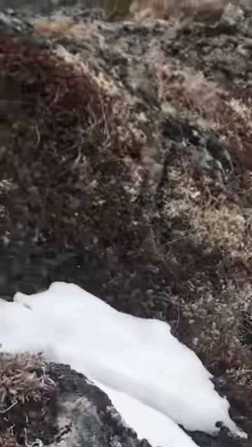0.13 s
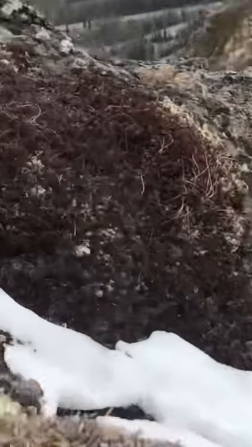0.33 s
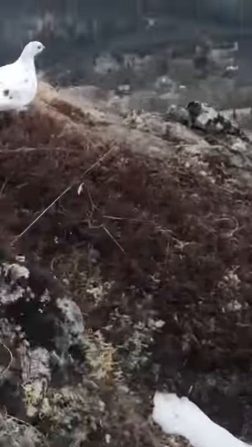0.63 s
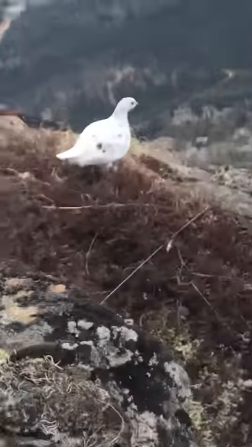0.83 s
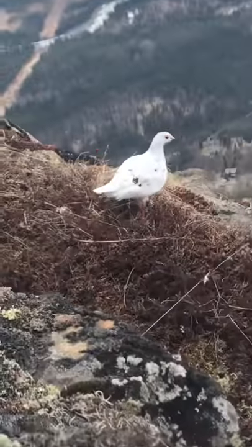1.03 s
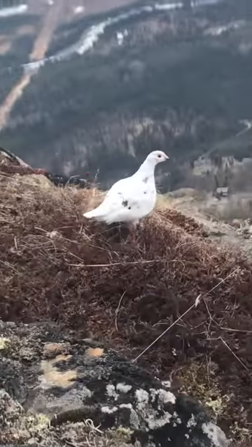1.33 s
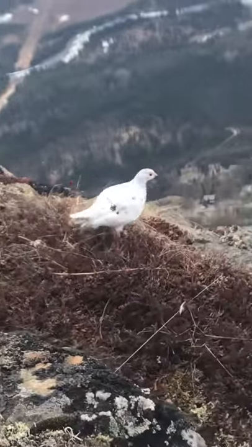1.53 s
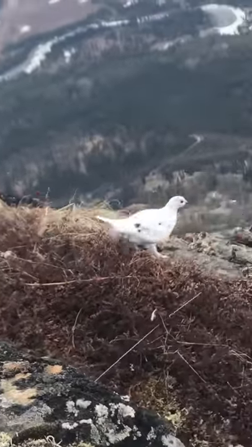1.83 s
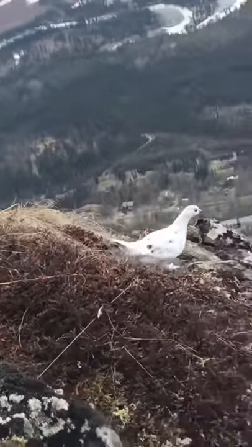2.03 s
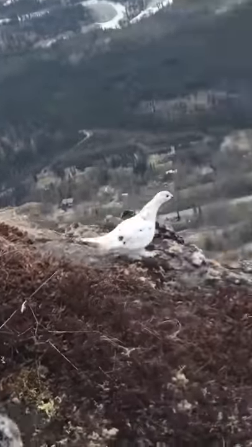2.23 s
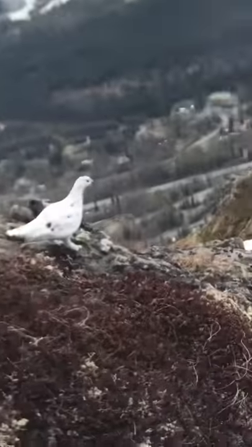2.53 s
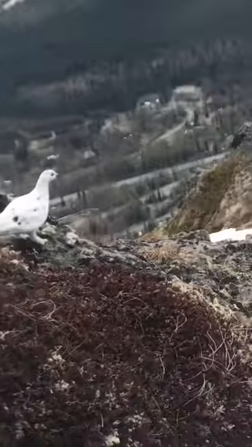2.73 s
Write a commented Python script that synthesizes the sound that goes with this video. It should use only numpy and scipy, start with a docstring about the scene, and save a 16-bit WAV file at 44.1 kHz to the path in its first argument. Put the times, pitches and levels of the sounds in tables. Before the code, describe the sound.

Dry, throaty bird clicks come in two short runs as wind buffets the microphone.

```python
"""An open ridge, with wind rumbling on the microphone throughout. Close by, clothing rustles and
heather twigs snap under a step. A ptarmigan gives a short run of dry clicks that ring in its throat,
slowing and turning hollow, as eddies begin to knock on the microphone. A second, shorter run follows.
Near the end a small bird chirps faintly, far down the valley."""
import sys
import numpy as np
from scipy import signal
from scipy.fft import rfft, irfft
from scipy.io import wavfile
from scipy.ndimage import uniform_filter1d

SR = 44100
rng = np.random.default_rng(int(sys.argv[2]) if len(sys.argv) > 2 else 0)


def waveform_to_disk(signal):
    """Save audio, clipped to [-1, 1], as 16-bit WAV at the path in sys.argv[1]."""
    frames = np.transpose(np.atleast_2d(signal))
    scaled = np.clip(frames, -1, 1) * 32767
    samples = np.round(scaled).astype(np.int16)
    wavfile.write(sys.argv[1], SR, samples)


N = 127890
T = np.arange(N) / SR
BURST_T = T[:4096]  # time within one click or snap, s


def from_db(db):
    """Decibels to gain."""
    return 10 ** (np.asarray(db) / 20)


def rms_one(x):
    """Scale to unit rms."""
    return x / np.sqrt(np.mean(x ** 2) + 1e-20)


def level(rows):
    """Gain over time from rows of time_s, level_db."""
    return from_db(np.interp(T, *np.transpose(rows)))


def cut(x, hz, kind, order=2):
    """Butterworth filter."""
    return signal.sosfilt(signal.butter(order, hz, kind, fs=SR, output="sos"), x)


def coloured(x, colour):
    """Shape a spectrum by rows of freq_hz, gain_db, falling 20 dB an octave past the ends; unit rms."""
    hz, db = np.transpose(colour)
    octave = np.log2(np.maximum(np.arange(N // 2 + 1) * SR / N, 1))
    beyond = np.abs(octave - np.clip(octave, np.log2(hz[0]), np.log2(hz[-1])))
    gain = from_db(np.interp(octave, np.log2(hz), db) - 20 * beyond)
    return rms_one(irfft(rfft(x) * gain, N))


def noise(colour):
    """Noise with the given spectrum."""
    return coloured(rng.standard_normal(N), colour)


def drift(rate_hz):
    """Random wander below the given rate, at unit rms."""
    return rms_one(cut(rng.standard_normal(N + SR), rate_hz, "low")[SR:])


def ring(x, hz, t60):
    """A resonance: each impulse starts a sine that dies by 60 dB in t60 seconds."""
    r, w = from_db(-60 / (t60 * SR)), 2 * np.pi * hz / SR
    return signal.lfilter([0, np.sin(w)], [1, -2 * r * np.cos(w), r * r], x + 1e-18)


def add(out, start_s, x):
    """Mix a sound in at a time."""
    i = int(start_s * SR)
    out[i:i + len(x)] += x[:N - i]


def grains(per_s, low_hz, high_hz, count=16, ring_cycles=9, spread_db=3):
    """Tiny slips of uneven size, each ringing briefly at one of several pitches."""
    sizes = from_db(spread_db * np.minimum(rng.exponential(1, N), 4)) * rng.choice([-1, 1], N)
    slips = sizes * (rng.random(N) < per_s / SR)
    pitch_index = rng.integers(0, count, N)
    pitches = enumerate(np.geomspace(low_hz, high_hz, count))
    return rms_one(sum(hz * ring(slips * (pitch_index == k), hz, ring_cycles / hz) for k, hz in pitches))


def valley_hush():
    """The soft, nearly steady hush of distant air."""
    # spectrum of the hush: freq_hz, gain_db
    colour = [(290, -15.5), (500, -7), (611, -4), (748, -3.5), (876, -4), (982, -3), (1090, -6.5),
              (1430, -10), (2100, -21), (2720, -21), (4570, -29), (15500, -33)]
    # its loudness: time_s, level_db
    loudness = [(0, -58.5), (.7, -63), (1.1, -63.5), (1.4, -63), (2.0, -64), (2.5, -63), (2.9, -62)]
    return level(loudness) * noise(colour)


def far_songbird():
    """A small bird far down the valley whistles short, wavering glides."""
    # chirps: start_s, length_s, start_hz, end_hz, level_db
    chirps = [(2.452, .06, 2680, 2850, -76), (2.515, .03, 3750, 3500, -76), (2.57, .035, 3550, 3270, -74.5),
              (2.63, .028, 3280, 3330, -73)]
    out = np.zeros(N)
    waver = 1 + .022 * drift(rate_hz=150)
    for start_s, length_s, start_hz, end_hz, level_db in chirps:
        progress = np.clip((T - start_s) / length_s, 0, 1)
        pitch_hz = (start_hz + (end_hz - start_hz) * progress) * waver
        swell = np.sqrt(np.abs(np.sin(np.pi * progress)))
        out += from_db(level_db) * swell * np.sin(2 * np.pi * np.cumsum(pitch_hz) / SR)
    return out


def wind(rumble_db=1.5, top_hz=204.6, even_s=.035, flutter_depth_db=5.5):
    """Rumble follows the wind pressure on the microphone; above it the air flutters quickly."""
    # wind pressure: time_s, relative_db
    pressure = [(0.0, -32.5), (0.03, -25.5), (0.37, -34.5), (0.38, -29), (0.7, -33.5), (0.76, -24.5),
                (0.86, -27), (0.95, -18.5), (1.12, -26), (1.31, -20), (1.33, -24.5), (1.39, -21.5),
                (1.5, -29), (1.56, -21), (1.6, -26), (1.71, -19), (1.8, -31.5), (1.96, -20), (1.98, -29),
                (2.02, -17.5), (2.05, -27.5), (2.35, -22.5), (2.38, -31.5), (2.58, -23.5), (2.61, -37),
                (2.74, -16), (2.82, -30.5), (2.88, -17)]
    # spectrum of the rumble: freq_hz, gain_db
    rumble_colour = [(20, -30.5), (30, -25.5), (40, -2.5), (52, 2), (72, 3.5), (100, -4.5), (130, -11),
                     (170, -15), (250, -24)]
    # loudness of the flutter: time_s, level_db
    flutter_level = [(0, -49), (.15, -50), (.3, -60), (.55, -62), (.85, -57), (.97, -43), (1.06, -46),
                     (1.13, -55), (1.32, -47), (1.38, -53), (1.52, -48), (1.69, -43), (1.77, -55),
                     (2.1, -52), (2.17, -55), (2.33, -45), (2.43, -56), (2.56, -51), (2.65, -54),
                     (2.74, -45), (2.82, -53), (2.9, -47)]
    # spectrum of the flutter: freq_hz, gain_db
    flutter_colour = [(150, -10), (210, 2), (270, -4.5), (360, -8.5), (480, -20), (700, -28.5)]
    rumble = cut(noise(rumble_colour), top_hz, "low", order=4)
    rumble /= np.sqrt(uniform_filter1d(rumble ** 2, int(even_s * SR)) + 1e-9)  # even out chance swells
    flutter = noise(flutter_colour) * rms_one(from_db(flutter_depth_db * drift(rate_hz=37)))
    return from_db(rumble_db) * level(pressure) * rumble + level(flutter_level) * flutter


def buffets(half_width_cycles=.42):
    """Each eddy is one short, smooth swing of pressure on the microphone."""
    # small eddies knocking: centre_s, level_db, pitch_hz
    knocks = [(.9603, -29.5, 250), (.9775, -28, 270), (1.0, -18, 172), (1.0085, -24, 470),
              (1.012, -15, 290), (1.0665, -35, 383), (1.303, -36, 430), (1.433, -27.5, 256),
              (1.543, -26, 225), (1.611, -35, 604), (1.615, -19, 343), (1.638, -32.5, 277),
              (1.6635, -37, 404), (1.6695, -32, 571), (1.671, -16, 302), (1.685, -18.5, 335),
              (1.7427, -34, 417), (1.945, -42, 333), (2.088, -31, 278), (2.35, -28.5, 265),
              (2.365, -28.5, 273), (2.757, -38, 310)]
    # heavy gusts thudding: centre_s, level_db, pitch_hz
    thuds = [(.961, -8, 92.3), (1.69, -10, 97.7), (1.715, -12, 54.2), (2.017, -22, 78), (2.541, -14, 63),
             (2.572, -13.5, 94)]
    out = np.zeros(N)
    for centre_s, level_db, pitch_hz in knocks + thuds:
        cycles = (T - centre_s) * pitch_hz
        swell = np.exp(-.5 * (cycles / half_width_cycles) ** 2)
        out += from_db(level_db) * swell * np.sin(2 * np.pi * cycles)
    return out


def clothing(slip_share=.65):
    """Cloth rubs close to the microphone in swishes full of tiny slips."""
    # swishes that swell and fade: peak_s, rise_s, fall_s, level_db
    swishes = [(.05, 0.044, 0.0037, -60), (0.123, 0.011, 0.014, -59), (0.2234, 0.00052, 0.0047, -50.5),
               (.343, 0.016, 0.0042, -57.5), (.445, 0.0097, 0.023, -61.5), (.515, 0.048, 0.043, -65.5),
               (0.569, 0.0074, 0.0049, -55.5), (0.159, .02, .2, -91), (.74, 0.34, 0.057, -73.5),
               (1.67, 0.02, 0.021, -63.5), (1.826, 0.055, 0.046, -63), (1.94, 0.073, 0.05, -67.5),
               (2.044, 0.0055, 0.01, -59), (2.112, 0.016, 0.0099, -66)]
    # spectrum of the cloth: freq_hz, gain_db
    colour = [(2000, -20), (4000, -4), (6300, -1.5), (7800, -3.5), (9500, 4.5), (10500, -2.5), (12800, 8.5),
              (15500, -1)]
    power = np.zeros(N)
    for peak_s, rise_s, fall_s, level_db in swishes:
        fade = np.maximum((peak_s - T) / rise_s, (T - peak_s) / fall_s)
        power += from_db(level_db) ** 2 * np.exp(-2 * fade)
    slips = grains(per_s=3000, low_hz=3900, high_hz=15000)
    friction = slip_share * slips + (1 - slip_share) * rng.standard_normal(N)
    return np.sqrt(power) * coloured(friction, colour)


def heather():
    """Heather crackles as it is crushed underfoot."""
    # loudness of the crunch: time_s, level_db
    crunch = [(0, -66), (.06, -61), (.13, -60), (.15, -71), (.4, -71), (.47, -66), (.6, -70), (.85, -75),
              (1.2, -86), (2.9, -95)]
    # its spectrum: freq_hz, gain_db
    colour = [(1000, 5), (2500, -5.5), (4200, -3.5), (5200, -5.5), (6400, -3.5), (8000, -8.5), (15000, -7)]
    return level(crunch) * coloured(grains(per_s=3000, low_hz=1190, high_hz=13600), colour)


def fibre_ticks(release_s=.0012, ring_cycles=16):
    """A thin fibre lets go in about a millisecond and rings at one high pitch."""
    # ticks of dry stems and cloth: start_s, peak_db, pitch_hz
    ticks = [(.0468, -50, 8080), (.0664, -62, 7030), (.0785, -56, 6700), (.0965, -55, 6150),
             (.1048, -43.5, 9800), (.1228, -40.5, 4050), (.2335, -47, 6550), (.4394, -50, 13500),
             (.5661, -53, 8580), (.651, -51.5, 5600), (.7149, -55.5, 9000), (1.692, -56, 3270),
             (1.8004, -43.5, 11600), (1.9295, -52, 12500), (2.05, -56, 9000), (2.1036, -51, 13500),
             (2.1114, -55, 13000), (2.1181, -43.5, 13500)]
    out = np.zeros(N)
    for start_s, peak_db, pitch_hz in ticks:
        release = rng.standard_normal(len(BURST_T)) * np.exp(-BURST_T / release_s)
        tick = cut(ring(release, pitch_hz, ring_cycles / pitch_hz), pitch_hz / 2, "high")
        add(out, start_s, from_db(peak_db) * tick / np.abs(tick).max())
    return out


def twigs(splinters_per_s=3500, splinter_size=.35, top_hz=7160, crack_db=-31):
    """A break and a dying spray of splinters ring the dry wood, under a thin bright crack."""
    # twigs snapping underfoot: start_s, peak_db, brightness_hz, spray_decay_s, lowest_mode_db
    snaps = [(0.05, -36.5, 3000, .003, -4), (0.0783, -31, 3340, 0.00097, -7),
             (0.081, -32, 3300, 0.0021, -1.5), (0.0964, -30, 3670, 0.00024, -5),
             (0.1045, -25, 3430, 0.00051, 6), (0.1053, -24.5, 6100, 0.0022, -11.5),
             (0.125, -46, 6000, 0.0018, -1), (0.2335, -34, 3200, 0.00048, -16),
             (0.255, -31, 3300, 0.00058, -12), (0.285, -44, 3000, 0.00046, -11),
             (0.4032, -42, 3400, 0.0012, -8), (0.457, -45, 3800, 0.0037, -19),
             (0.6506, -39.5, 1270, 0.00085, -4)]
    # modes of the wood: pitch_hz, gain_db, t60_s
    modes = [(568, 4, 0.023), (1136, 6, 0.0061), (1500, 9, 0.0021), (2980, -8.5, 0.0077),
             (6260, -2.5, 0.01)]
    out, size = np.zeros(N), len(BURST_T)
    for start_s, peak_db, brightness_hz, spray_decay_s, lowest_mode_db in snaps:
        splinters = (rng.random(size) < splinters_per_s / SR) * rng.standard_normal(size)
        force = signal.unit_impulse(size) + splinter_size * splinters * np.exp(-BURST_T / spray_decay_s)
        wood = sum((-1) ** k * from_db(gain_db + lowest_mode_db * (k == 0)) * ring(force, hz, t60)
                   for k, (hz, gain_db, t60) in enumerate(modes))
        wood = cut(wood, 340, "high")
        body = cut(cut(wood, brightness_hz, "low", order=4), top_hz, "low", order=6)
        snap = body + from_db(crack_db) * wood
        add(out, start_s, from_db(peak_db) * snap / np.abs(snap).max())
    return out


def ptarmigan():
    """Each click rings four throat resonances, with a rasp and a bright snap; the ground echoes it."""
    # throat clicks: start_s, gain_db, low1_hz, low2_hz, upper1_hz, upper2_hz, low_t60_s, upper_db
    clicks = [(0.818, -51.5, 1300, 1975, 2750, 6000, 0.0064, 1.5),
              (0.8718, -53, 894, 1940, 3420, 4600, 0.022, -4),
              (0.921, -42.5, 788, 1930, 3600, 4600, 0.013, 0.5),
              (0.9637, -40, 712, 1830, 3240, 4600, 0.011, -5.5),
              (1.0109, -40.5, 1038, 1724, 3600, 5450, 0.029, -8),
              (1.1003, -39.5, 1170, 1745, 3970, 5500, 0.023, -10),
              (1.1961, -40.5, 1080, 1660, 3740, 5450, 0.025, -13.5),
              (2.1737, -44, 802, 1820, 3260, 4600, 0.011, -4),
              (2.2184, -38.5, 824, 1890, 3220, 4650, 0.01, -4),
              (2.2622, -39, 863, 1830, 3280, 5050, 0.015, -6.5)]
    # strength of the four resonances, lowest first: gain_db
    throat_db = [2.5, 0.5, -4.5, -7]
    upper_t60_s, top_hz = .0095, 6600
    rasp_db, rasp_decay_s, rasp_from_hz = -16, .0015, 380
    echo_delay_s, echo_db = .0046, -15
    out, pulse = np.zeros(N), signal.unit_impulse(len(BURST_T))
    snap = from_db(-9.5) * ring(pulse, hz=6050, t60=.004)
    for start_s, gain_db, *pitches_hz, low_t60_s, upper_db in clicks:
        upper = from_db(upper_db)
        gains = from_db(throat_db) * [-1, 1, -upper, upper]
        decays = (low_t60_s, low_t60_s, upper_t60_s, upper_t60_s)
        throat = sum(gain * ring(pulse, hz, t60) for gain, hz, t60 in zip(gains, pitches_hz, decays))
        burst = rng.standard_normal(len(BURST_T)) * np.exp(-BURST_T / rasp_decay_s)
        rasp = from_db(rasp_db) * cut(burst, rasp_from_hz, "high")
        click = from_db(gain_db) * cut(throat + upper * (rasp - snap), top_hz, "low", order=10)
        add(out, start_s, click)
        add(out, start_s + echo_delay_s, from_db(echo_db) * click)
    return out


def scene():
    """All sources at one microphone on the ridge."""
    ridge = ptarmigan() + twigs() + fibre_ticks() + wind() + buffets() + clothing() + heather()
    return (ridge + valley_hush() + far_songbird())[None]


def record(dry, cutoff_hz=16000):
    """The highest treble is cut steeply."""
    return signal.sosfilt(signal.ellip(12, .1, 80, cutoff_hz, fs=SR, output="sos"), dry)


dry = scene()
out = record(dry)
waveform_to_disk(out)
```